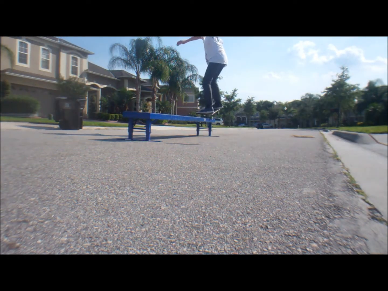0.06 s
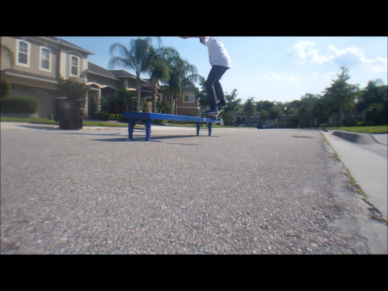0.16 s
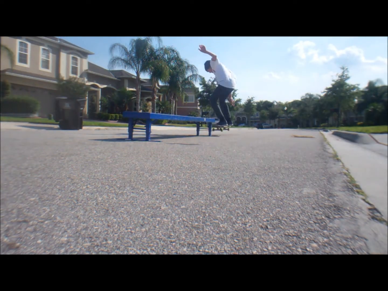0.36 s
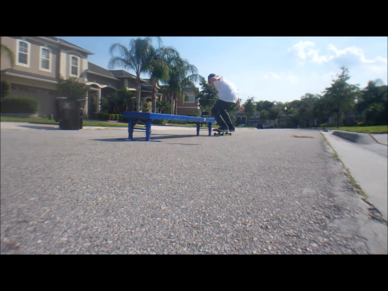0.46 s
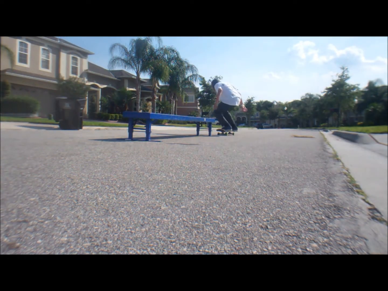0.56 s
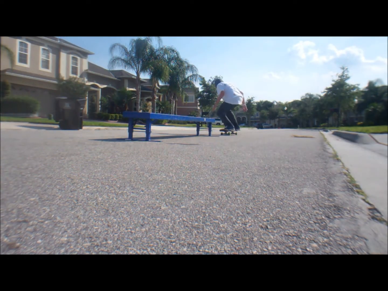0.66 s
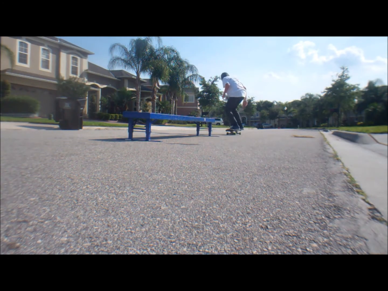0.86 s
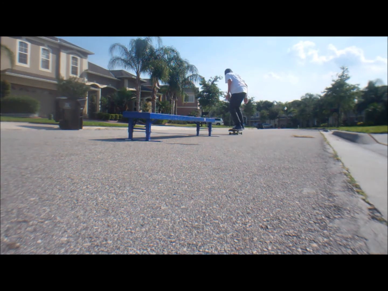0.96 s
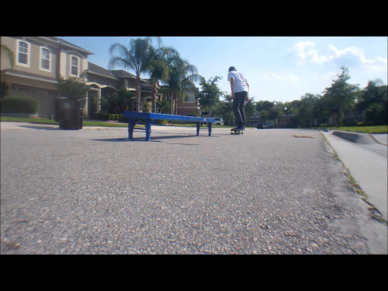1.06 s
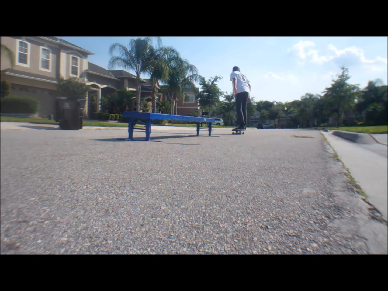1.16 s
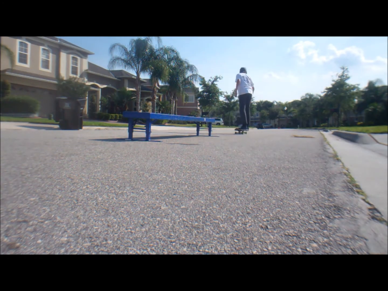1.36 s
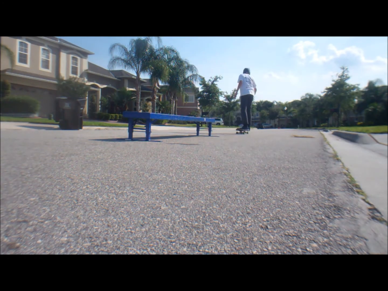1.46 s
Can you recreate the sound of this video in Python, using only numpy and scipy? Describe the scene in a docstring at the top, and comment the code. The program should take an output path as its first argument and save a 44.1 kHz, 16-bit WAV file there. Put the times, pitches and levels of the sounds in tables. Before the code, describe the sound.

A skateboard grinds along a metal bench, lands with a sharp clack and rolls away.

```python
"""A skateboard grinds along a steel bench while the street still echoes from its jump onto it.
Stick-slip friction rasps, judders and draws squeals from the bench's modes; the board drags off the
end and its free wheels whirr. At 0.48 s the first wheels touch, at 0.52 s the board slaps down and
overloads a pair of microphones near the ground. House fronts reflect the clack. The wheels then roll
away over coarse asphalt, snapping loose grit and meeting two bumps."""
import sys
import numpy as np
from scipy import signal
from scipy.fft import rfft, irfft
from scipy.io import wavfile
from scipy.ndimage import uniform_filter1d

SR = 44100
rng = np.random.default_rng(int(sys.argv[2]) if len(sys.argv) > 2 else 0)


def put_to_file(sound):
    """Save the sound as 16-bit audio at rate SR, in the file named by the first command-line argument."""
    columns = np.atleast_2d(sound).T  # one column per channel
    safe = np.clip(columns, -1, 1)
    whole_steps = np.round(safe * 32767)
    wavfile.write(sys.argv[1], SR, whole_steps.astype(np.int16))


N = 66150

# pressure of the slide (t/s, level/dB)
SLIDE_PRESSURE = [(0, -26.5), (.025, -30.5), (.05, -36), (.078, -34.5), (.1, -28), (.13, -24.5), (.15, -26),
                  (.168, -21.5), (.195, -23.5), (.22, -22), (.255, -23), (.282, -26), (.31, -22.5),
                  (.33, -28), (.35, -70), (.4, -69)]
# spectrum of the sliding board's rasp (f/Hz, level/dB)
RASP_SPECTRUM = [(100, -30.5), (300, -23), (600, -5), (1300, 0), (1800, -1.5), (2400, 3.5), (3200, -0.5),
                 (4500, -2), (5600, -4.5), (7000, -16), (10000, -23), (14000, -18.5)]
# modes of the steel bench (f/Hz, level/dB)
BENCH_MODES = [(778, -18), (1413, -11), (2035, -1), (2122, -8), (2313, -8), (2400, -6), (2782, -8),
               (3492, -3), (3663, -2), (3955, -2), (4364, -2), (4508, 0), (5165, -4), (5540, -2)]
# bouts of juddering (centre t/s, duration/s, level/dB) and their spectrum (f/Hz, level/dB)
JUDDER_BOUTS = [(0.047, 0.12, -43), (0.196, 0.03, -37.5), (0.308, 0.093, -27.5)]
JUDDER_SPECTRUM = [(40, -40), (130, -8), (330, 5.5), (700, -5.5), (1200, 6.5), (2000, -15), (5000, -15.5)]
# spectra of the open air and of the street's echo (f/Hz, level/dB)
AIR_SPECTRUM = [(18, -44), (30, -35), (148, -12.5), (534, -8.5), (674, -3.5), (917, -9), (1740, -13),
                (2310, -18.5), (4180, -24), (14000, -37)]
ECHO_SPECTRUM = [(100, -25), (250, -14.5), (480, -7), (620, 2), (820, -2), (950, -14.5), (1250, -13),
                 (1700, -36.5), (4000, -15), (12000, -33)]
# reflections from house fronts (delay/s, specular level/dB, scattered level/dB, scatter T60/s)
REFLECTIONS = [(.0615, -21, -21, .04), (.0935, -13, -20, .035), (.128, -32, -27, .08), (.16, -38, -24, .14)]
# friction locked to a mode (peak t/s, rise/s, f/Hz, level/dB, T60/s)
SQUEAL_TONES = [(.168, .03, 3492, -26, .12), (.174, .025, 2395, -29, .1), (.225, .03, 2313, -28, .12),
                (.25, .04, 2400, -23, .11), (.245, .025, 2122, -29, .12), (.248, .03, 2035, -29, .38),
                (.262, .02, 3663, -24, .14), (.243, .025, 4364, -28, .12), (.256, .025, 4508, -26, .12),
                (.243, .04, 5540, -30, .12)]
# whirr of the free wheels: envelope (t/s, level/dB) and spectrum (f/Hz, level/dB)
WHIRR_LEVEL = [(.28, -68), (.35, -33), (.41, -39.5), (.5, -31.5), (.54, -39), (.63, -43.5), (.75, -62)]
WHIRR_SPECTRUM = [(100, 0), (350, -2), (1200, 5.5), (2500, 3), (4500, -4.5), (7500, -5), (10000, -11),
                  (14000, -4)]
# blows of the landing (t/s, truck level/dB, deck level/dB, thud level/dB, crack level/dB)
LANDING_BLOWS = [(0.4793, -13, -26, -24, -47), (0.4804, -2.5, -30, -19, -24.5),
                 (0.4826, -39, -31, -17, -38), (0.4868, -25, -23, -44, -39), (0.5191, -4, 5, 5.5, -3),
                 (0.5203, -4.5, 4.5, -17, -11), (0.5273, -7.5, 0, -9.5, -16), (0.5324, -11, -13, -16, -28)]
# modes of truck and deck (f/Hz, level/dB, T60/s)
TRUCK_MODES = [(462, -17, .026), (829, 0, .014), (1039, -10, .027), (1238, -10, .024), (1532, -3, .031),
               (2285, 1, .011), (2683, -2, .014), (3169, -3, .009), (4488, -11, .013)]
DECK_MODES = [(251, -23, .046), (362, -6, .018), (496, -16, .048), (640, -15, .045), (729, -14, .03),
              (1166, -15, .035), (1278, 0, .01), (1675, 1.5, .023), (1990, -4, .016), (2797, -12, .022),
              (4107, -12, .016)]
# spectra of the landing's thud and crack (f/Hz, level/dB)
THUD_SPECTRUM = [(25, -21), (90, -15.5), (200, 6), (400, 5), (750, 8.5), (1100, -2.5), (2500, -14.5),
                 (8000, -43)]
CRACK_SPECTRUM = [(200, -47), (1000, 7.5), (2000, 7), (4200, -4.5), (6000, -4), (7500, -2.5), (9500, -12),
                  (13500, 0), (16000, -14)]
# wheels on asphalt (t/s, rumble level/dB, grit level/dB)
ROLL_LEVELS = [(.53, -46, -67), (.62, -43, -55), (.7, -44.5, -46.5), (.8, -48.5, -46), (.87, -39, -43),
               (.93, -37, -37.5), (1.01, -32.5, -35.5), (1.08, -35, -31.5), (1.155, -34.5, -32),
               (1.2, -37, -42), (1.25, -41, -45.5), (1.29, -33.5, -40.5), (1.315, -46, -44),
               (1.38, -36, -38.5), (1.43, -40.5, -39), (1.5, -33, -34.5)]
# low, middle and high bands of the rolling noise (f/Hz, level/dB)
RUMBLE_SPECTRUM = [(25, -48), (60, -17), (100, -7), (145, -2), (225, -1), (275, -0.5), (340, 2.5),
                   (430, -1), (530, -6), (700, -12.5), (1000, -12.5), (2500, -33)]
GRIT_SPECTRUM = [(300, -39), (700, -4.5), (950, -4), (1090, 5.5), (1460, -4.5), (1610, 2), (1800, -4.5),
                 (2400, -11), (2650, -7), (3000, -10), (4500, -16.5), (8500, -29.5), (14000, -24.5)]
TICK_SPECTRUM = [(1500, -18), (4000, -4), (7000, 0), (10000, 0), (14000, 0)]
# loose grit snapping under a wheel (t/s, crunch level/dB, tick level/dB)
GRIT_SNAPS = [(1.063, -33, -42), (1.085, -33, -39), (1.158, -25, -44), (1.286, -28.5, -44),
              (1.409, -33, -31.5), (1.478, -28, -35)]
# bumps in the road (t/s, level/dB)
ROAD_BUMPS = [(1.340, -23), (1.459, -28)]
# stereo difference near the bench, for the wheels and for the diffuse field (f/Hz, side level/dB)
NEAR_SIDE = [(100, -26), (350, -28), (650, -14), (1100, -22), (2400, -12), (5000, -26), (9000, -17),
             (14000, -9)]
WHEEL_SIDE = [(200, -26), (700, -36), (1300, -21), (2400, -10.5), (5000, -8), (10000, -6.5)]
DIFFUSE_SIDE = [(100, -16), (350, -12), (700, -10.5), (1300, -2.5), (2400, 1.5)]
# excess of the crack's treble at the right microphone over the left (f/Hz, level/dB)
RIGHT_EXCESS = [(5000, 0), (8000, 1), (13000, 3.5)]


def undb(db):
    """Amplitude ratio of a level in decibels."""
    return 10 ** (np.asarray(db) / 20)


def unit(x):
    """Normalisation to rms 1."""
    return x / np.sqrt(np.mean(x ** 2))


def clock():
    """Sample times in seconds."""
    return np.arange(N) / SR


def curve(rows, column=1):
    """Amplitude envelope by linear interpolation of levels in time."""
    rows = np.array(rows)
    return undb(np.interp(clock(), rows[:, 0], rows[:, column]))


def through(x, response):
    """A linear system convolves its input with its impulse response."""
    return signal.fftconvolve(x, response)[:N]


def colour(spectrum, size=4096):
    """Minimum-phase impulse response of a spectrum, by folding the cepstrum."""
    hz, db = np.array(spectrum).T
    freqs = np.maximum(np.arange(size // 2 + 1) * SR / size, 1)
    magnitude = undb(np.interp(np.log(freqs), np.log(hz), db))
    cepstrum = irfft(np.log(magnitude))
    cepstrum[1:size // 2] *= 2
    cepstrum[size // 2 + 1:] = 0
    return irfft(np.exp(rfft(cepstrum)))


def noise(spectrum):
    """Filtered Gaussian noise of rms 1."""
    return unit(through(rng.standard_normal(N), colour(spectrum)))


def grains(per_s, spread_db):
    """Shot noise: random tiny impacts, a few much larger than the rest."""
    size = undb(spread_db * np.minimum(rng.exponential(size=N), 4))
    return unit((rng.random(N) < per_s / SR) * size * rng.choice([-1, 1], N))


def patter(spectrum, per_s, spread_db):
    """Filtered shot noise of rms 1."""
    return unit(through(grains(per_s, spread_db), colour(spectrum)))


def waver():
    """Random drift of rms 1: a moving average of white noise."""
    return unit(uniform_filter1d(rng.standard_normal(N), size=200))


def fade(start, t60):
    """Exponential decay from a sudden onset, 60 dB in t60 seconds."""
    age = clock() - start
    return (age >= 0) * np.exp(-np.log(1000) * np.maximum(age, 0) / t60)


def swell(peak, rise):
    """Raised-cosine envelope with equal rise and fall."""
    return np.cos(np.pi * np.clip((clock() - peak) / rise / 2, -.5, .5)) ** 2


def ring(modes):
    """Free vibration: a superposition of damped modes of alternating sign."""
    return sum((-1) ** k * undb(db) * fade(0, t60) * np.sin(2 * np.pi * hz * clock())
               for k, (hz, db, t60) in enumerate(modes))


def late(x, delay):
    """Pure delay in seconds."""
    return np.concatenate([np.zeros(int(max(delay, 0) * SR)), x, np.zeros(N)])[:N]


def grind(bench_t60=.27, damping_hz=2680):
    """Stick-slip friction rasps on the board and drives the bench, whose higher modes decay faster."""
    slips = grains(per_s=5000, spread_db=1)
    pressure = curve(SLIDE_PRESSURE)
    rasp = pressure * unit(through(slips, colour(RASP_SPECTRUM)))
    steel = ring([(hz, db, bench_t60 * min(1, damping_hz / hz)) for hz, db in BENCH_MODES])
    ringing = through(slips * pressure, steel / np.linalg.norm(steel))
    return undb(-1) * rasp + undb(-8) * ringing


def judder():
    """Irregular vibration of the board on the bench gives swells of low and middle noise."""
    envelope = sum(undb(db) * swell(at, duration / 2) for at, duration, db in JUDDER_BOUTS)
    return envelope * noise(JUDDER_SPECTRUM)


def background():
    """Steady ambient noise lies under the decaying reverberation of the jump onto the bench."""
    return undb(-42.5) * noise(AIR_SPECTRUM) + undb(-35) * fade(0, t60=1) * noise(ECHO_SPECTRUM)


def street_echo(x):
    """House fronts return dull specular and scattered reflections over a faint reverberant tail."""
    tail = rng.standard_normal(N) * fade(0.007, t60=1)
    response = undb(-18.5) * tail / np.linalg.norm(tail)
    for delay, specular_db, scatter_db, t60 in REFLECTIONS:
        scatter = rng.standard_normal(N) * fade(delay, t60)
        response += undb(scatter_db) * scatter / np.linalg.norm(scatter)
        response += undb(specular_db) * late(np.ones(1), delay)
    return through(through(x, response), colour(ECHO_SPECTRUM))


def squeals(drift_hz=38, roughness=.45):
    """Self-excited oscillation: friction locks to bench modes, and each swells, then rings out."""
    tones = 0
    for at, rise, hz, db, t60 in SQUEAL_TONES:
        tone = np.sin(2 * np.pi * np.cumsum(hz + drift_hz * waver()) / SR)
        envelope = np.where(clock() < at, swell(at, rise), fade(at, t60))
        tones += undb(db) * envelope * (1 + roughness * waver()) * tone
    return undb(2) * tones


def bearings():
    """Dense tiny impacts in the bearings of the unloaded wheels merge into a whirr."""
    return curve(WHIRR_LEVEL) * patter(WHIRR_SPECTRUM, per_s=19000, spread_db=5.5)


def knocks():
    """Impulsive excitation: each landing blow rings truck and deck and thuds on the road."""
    truck, deck = ring(TRUCK_MODES) / 2, ring(DECK_MODES) / 2
    thud = colour(THUD_SPECTRUM)
    thud = np.pad(thud / np.abs(thud).max(), (0, N - len(thud)))
    return sum(late(undb(truck_db) * truck + undb(deck_db) * deck + undb(thud_db) * thud, at)
               for at, truck_db, deck_db, thud_db, _ in LANDING_BLOWS)


def cracks(crack_t60=.014, rattle_t60=.042):
    """Hard contact radiates a broadband burst, and the hardware rattles briefly."""
    envelope = sum(undb(db) * (fade(at, crack_t60) + undb(-10.5) * fade(at, rattle_t60))
                   for at, *_, db in LANDING_BLOWS)
    return envelope * noise(CRACK_SPECTRUM)


def rolling():
    """Roughness excitation: stones and bumps shake the board, and grit ticks under the wheels."""
    rumble = patter(RUMBLE_SPECTRUM, per_s=1800, spread_db=3)
    grit = patter(GRIT_SPECTRUM, per_s=1800, spread_db=3)
    ticks = undb(-17.5) * patter(TICK_SPECTRUM, per_s=2200, spread_db=12)
    on_road = clock() > ROLL_LEVELS[0][0]
    roll = rumble * curve(ROLL_LEVELS) + (grit + ticks) * curve(ROLL_LEVELS, column=2)
    jolts = sum(undb(db) * fade(at, t60=.033) for at, db in ROAD_BUMPS)
    bumps = (rumble + grit / 2) * uniform_filter1d(jolts, size=200)
    return on_road * roll + bumps


def snaps():
    """Loose grit gives way under a wheel's load in short noise transients."""
    crunch, tick = noise(GRIT_SPECTRUM), noise(TICK_SPECTRUM)
    return sum((undb(crunch_db) * crunch + undb(tick_db) * tick) * fade(at, t60=.014)
               for at, crunch_db, tick_db in GRIT_SNAPS)


def wide(source, side_spectrum):
    """Partial coherence: two close microphones agree in the bass and differ more in the treble."""
    return source() + through(source(), colour(side_spectrum)) * np.array([[1], [-1]])


def diffuse(source):
    """Sound arriving from the sides differs in phase between the microphones."""
    side = signal.hilbert(through(source(), colour(DIFFUSE_SIDE))).imag
    return source() + side * np.array([[1], [-1]])


def treble_to_right(pair):
    """Level difference: the right microphone receives more of the top treble."""
    return np.array([through(x, colour([(hz, sign * db / 2) for hz, db in RIGHT_EXCESS]))
                     for x, sign in zip(pair, (-1, 1))])


def delay_left(pair, lag_s=16e-6):
    """Path difference: the board is a little to the right, so its sound reaches the left later."""
    phase_shift = np.exp(-2j * np.pi * np.fft.rfftfreq(N, 1 / SR) * lag_s)
    return np.array([irfft(rfft(pair[0]) * phase_shift, N), pair[1]])


def scene():
    """Superposition of the direct sound of slide, landing and roll with the street's diffuse field."""
    slide = wide(lambda: grind() + squeals() + judder(), NEAR_SIDE)
    landing = knocks() + treble_to_right(wide(cracks, NEAR_SIDE))
    wheels = wide(lambda: rolling() + snaps(), WHEEL_SIDE) + wide(bearings, WHEEL_SIDE)
    board = slide + landing + wheels
    return delay_left(board) + diffuse(lambda: street_echo(board.mean(axis=0)) + background())


def record(dry, drive=.99, cutoff_hz=14250):
    """Saturation flattens the loudest peaks; a steep low-pass filter then limits the bandwidth."""
    lowpass = signal.ellip(10, .2, 80, cutoff_hz, fs=SR, output="sos")
    return signal.sosfilt(lowpass, np.tanh(drive * dry))


dry = scene()
out = record(dry)
put_to_file(out)
```